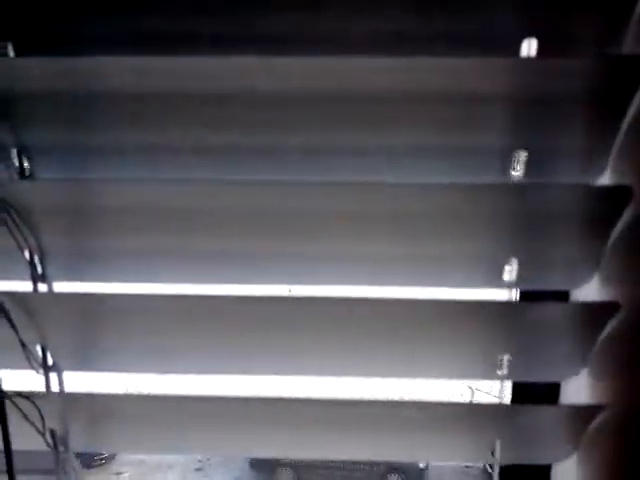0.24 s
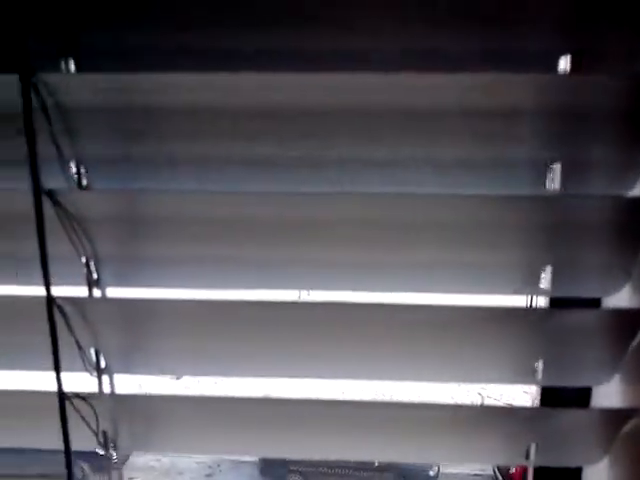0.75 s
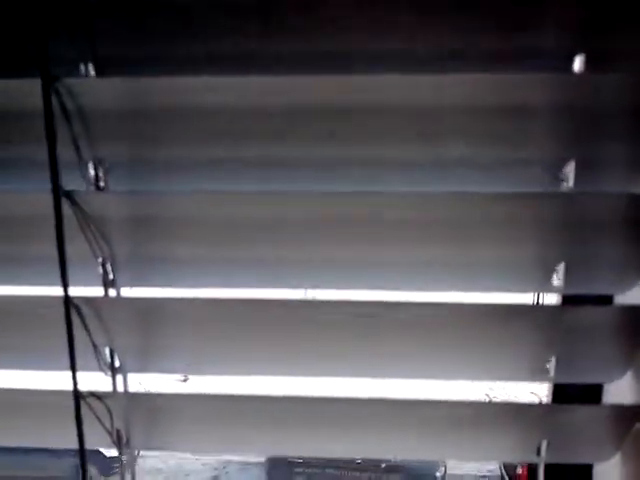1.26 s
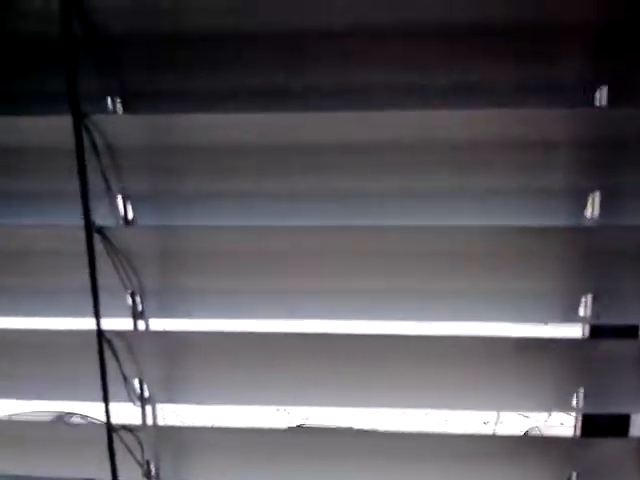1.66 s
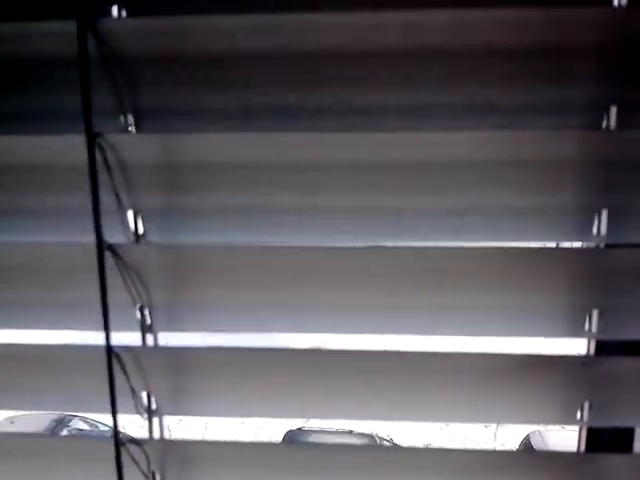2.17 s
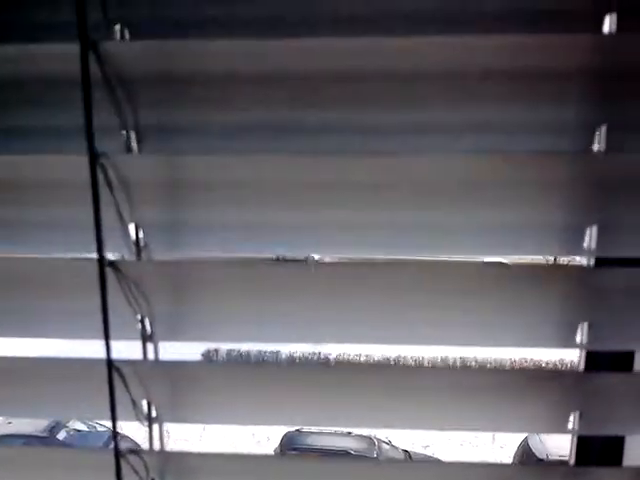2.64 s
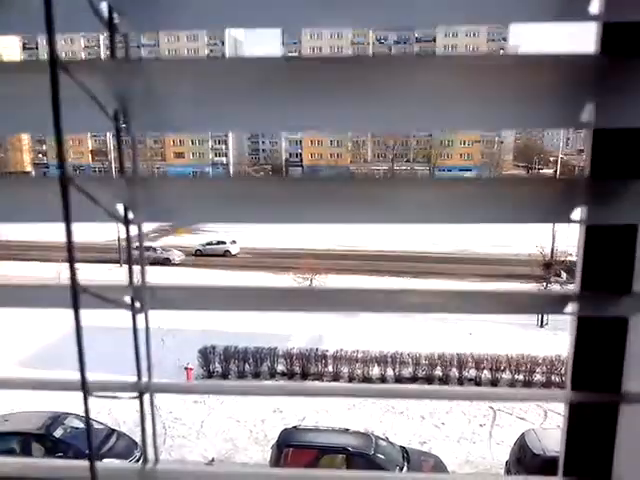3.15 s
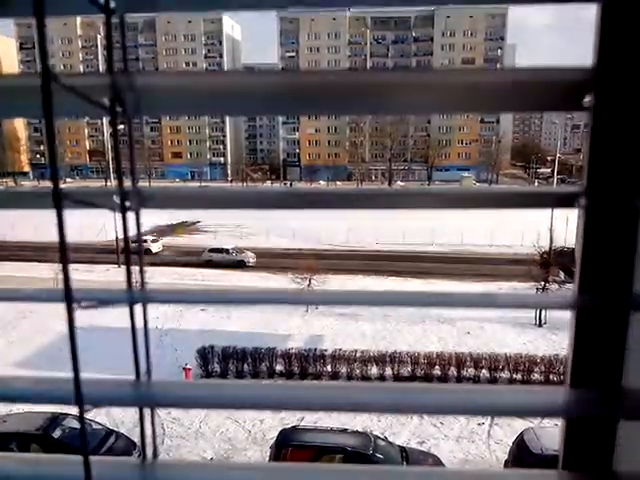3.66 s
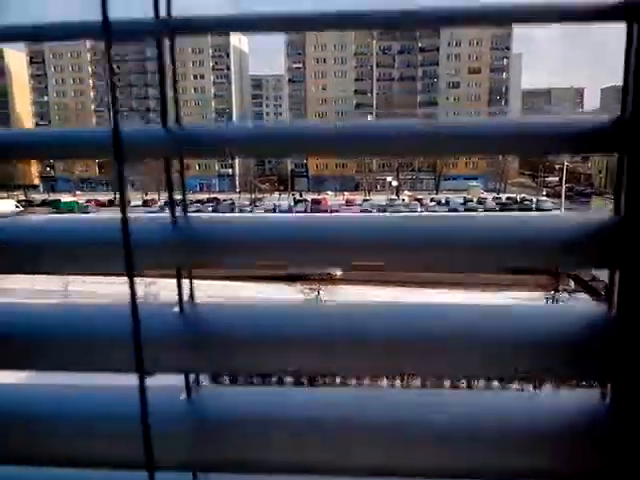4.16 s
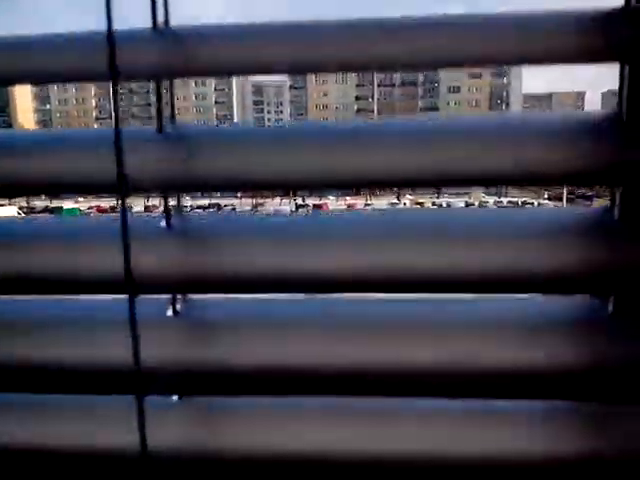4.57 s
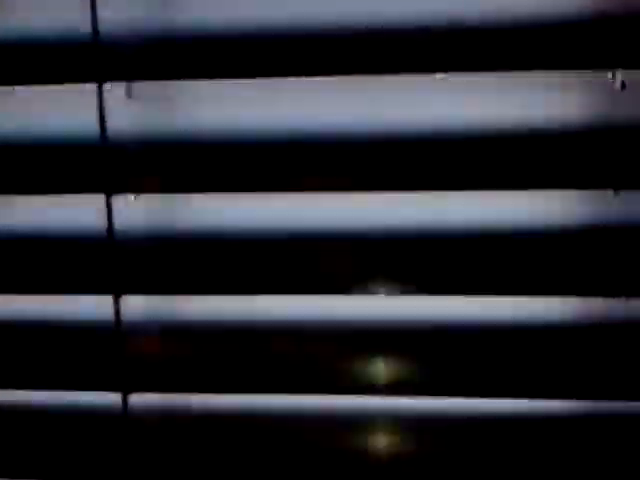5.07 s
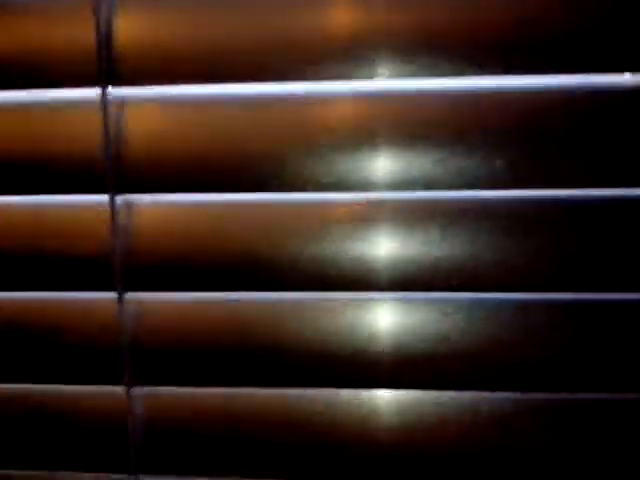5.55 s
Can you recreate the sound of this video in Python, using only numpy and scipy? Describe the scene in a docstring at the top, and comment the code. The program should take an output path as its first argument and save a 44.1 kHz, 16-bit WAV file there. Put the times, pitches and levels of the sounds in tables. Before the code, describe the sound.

Close to a venetian blind in a small quiet room: a short squealing, groaning scrape, a pause, one loud overloaded woody knock, then a cluster of knocks, loose rattles and bright thin slat snaps. Afterwards the tilt gear rasps softly about three times a second, with stray ticks, faint cord rustle and a low hum.

```python
"""Small room, microphone close to a venetian blind that is tilted by its wand.
First the wand rubs along the blind, noisy grains of friction under squealing and groaning tones.
From 0.6 s it knocks slats and frame, ringing modes with a loose rattle; from 1.6 s thin slats snap over brightly.
From 2.3 s the worm gear rasps about three times a second, swells of tiny clicks, as the fingers roll the wand on.
Soft cord drag, still air and a faint hum lie beneath throughout."""
import sys
import numpy as np
from scipy import signal
from scipy.fft import rfft, irfft
from scipy.io import wavfile

SR = 44100
rng = np.random.default_rng(int(sys.argv[2]) if len(sys.argv) > 2 else 0)


def persist_wave(psi):
    """Save psi, clipped to +-1, as 16-bit WAV."""
    counts = np.round(np.clip(psi, -1, 1) * 32767).astype(np.int16)
    wavfile.write(sys.argv[1], SR, np.atleast_2d(counts).T)


N = 256220
TIME = np.arange(N) / SR

# spectrum of the wand's scrape: freq_hz, level_db
RUB_COLOUR = [(100, -15.5), (300, 8), (600, 0), (1000, 10), (1500, 2.5), (1950, 3.5), (2500, -21.5),
              (3200, -19), (4000, -28), (7000, -22)]
# friction tones, each a curve: time_s, pitch_hz, level_db
MAIN_SQUEAL = [(0, 1100, -23.5), (.034, 1042, -22.5), (.18, 1015, -23), (.214, 960, -24.5),
               (.254, 827, -24.5), (.28, 835, -22)]
# a wavering squeal that dives
DIVING_SQUEAL = [(.19, 1943, -53), (.237, 1783, -27), (.3, 1462, -33.5), (.33, 1195, -25.5),
                 (.362, 968, -22), (.383, 938, -32)]
# a thin high whistle
WHISTLE = [(0, 4860, -48), (.058, 4860, -39), (.18, 4858, -44), (.21, 4830, -61.5)]
# two groans
GROAN = [(.05, 415, -27), (.165, 417, -50), (.21, 385.5, -33), (.33, 315, -49.5)]
LOW_GROAN = [(.09, 197.2, -30), (.125, 197.5, -51.5), (.33, 213.6, -40.5), (.378, 180, -31)]
RUB_END_S, RUB_RELEASE_S, SCRAPE_DB = 0.36, 0.026, -28.5
SQUEAL_OCTAVE_DB = -17.5   # the main squeal carries its octave
SQUEAL_ROUGH, WHISTLE_ROUGH, GROAN_ROUGH = .28, .12, .45   # depth of flutter


def rubbing():
    """The wand drags along the blind, then lifts off: uneven grains of friction, with squeals and groans."""
    friction = grains(N, per_s=1600, spread_db=1.5)
    slats = amp(SCRAPE_DB) * colour(friction, RUB_COLOUR)
    unevenness = amp(3.0 * wobble(23))
    scrape = unevenness * held(0, RUB_END_S, RUB_RELEASE_S) * slats
    squeals = squeal(MAIN_SQUEAL, SQUEAL_ROUGH, amp(SQUEAL_OCTAVE_DB)) + squeal(DIVING_SQUEAL, SQUEAL_ROUGH)
    whistle = squeal(WHISTLE, WHISTLE_ROUGH)
    groans = squeal(GROAN, GROAN_ROUGH) + squeal(LOW_GROAN, GROAN_ROUGH)
    rub = scrape + squeals + whistle + groans
    return rub + amp(-9.0) * room(rub)


SQUEAL_RELEASE_S, SQUEAL_FLUTTER_HZ, FRICTION_ATTACK_S = 0.0087, 82.6, 0.0012
SQUEAL_CHATTER = 0.35   # how deeply the head rail shakes a squeal, against its roughness


def squeal(curve, rough, octave=0):
    """A stick-slip tone follows the wand's speed and pressure; it flutters, and chatters with the head rail."""
    time_s, pitch_hz, level_db = np.transpose(curve)
    phase = 2 * np.pi * np.cumsum(np.interp(TIME, time_s, pitch_hz)) / SR
    rail_shake = rms_one(resonate(rng.standard_normal(N), RAIL_MODES))
    chatter = SQUEAL_CHATTER * rough * rail_shake
    tone = (1 + rough * wobble(SQUEAL_FLUTTER_HZ) + chatter) * np.sin(phase)
    tone = tone + rough * wobble(SQUEAL_FLUTTER_HZ) * np.cos(phase)
    overtone = octave * wobble(SQUEAL_FLUTTER_HZ) * np.sin(2 * phase)
    level = amp(np.interp(TIME, time_s, level_db)) * held(0, time_s[-1], SQUEAL_RELEASE_S)
    return level * np.sqrt(2) * (tone + overtone)


def held(start, end, release_s):
    """Envelope of a friction sound: quick attack, hold, exponential release."""
    attack = np.clip((TIME - start) / FRICTION_ATTACK_S, 0, 1)
    return attack * np.exp(-np.clip((TIME - end) / release_s, 0, 50))


# knocks of wand and rail: start_s, peak_db, pitch_hz, crack_db, rattle_db, rattle_pitch_hz, rattle_length_s
KNOCKS = [(0.606, -30, 1700, -38, -30, 1900, 0.006), (1.1685, 2.5, 726, -26.5, -21, 520, 0.0051),
          (1.65, -26, 480, -42.5, -21.5, 600, 0.015), (1.7443, -3.5, 1040, -17.5, -7, 616, 0.025),
          (1.794, -16, 352, -32, -17.5, 560, 0.041), (2.02, -33.5, 1900, -29, -22, 1700, 0.0083),
          (2.034, -20, 840, -30.5, -15.5, 820, 0.014), (2.063, -15.5, 327, -47.5, -17.5, 377, 0.019),
          (2.403, -15, 750, -39, -13.5, 900, 0.013), (2.454, -17.5, 560, -48, -24, 650, 0.01),
          (2.495, -27, 358, -63, -23, 395, 0.015), (2.521, -23, 613, -64.5, -23.5, 500, 0.0059),
          (2.535, -21.5, 416, -65.5, -23, 480, 0.012), (2.681, -25, 500, -37, -26, 500, 0.012),
          (2.765, -30, 1500, -31.5, -21, 1400, 0.011), (2.776, -22, 566, -33.5, -19, 540, 0.011)]
# spectrum of the short crack: freq_hz, level_db
CRACK_COLOUR = [(900, 2.5), (1800, 6), (3000, 0), (4500, -4.5), (7000, -2), (8000, -49.5)]
RATTLE_CRACK_DB = -25.5   # crackle of the rattle, against the crack of the knock


def knocks():
    """A short crack opens each knock and the frame rings; loose slats rattle on, crackling with its crack."""
    out, t = np.zeros(N), TIME[:SR // 4]
    for start_s, peak_db, pitch_hz, crack_db, rattle_db, rattle_hz, rattle_s in KNOCKS:
        ring = amp(peak_db) * frame(t, pitch_hz).sum(axis=0)
        crack = colour(rng.standard_normal(len(t)), CRACK_COLOUR) * np.exp(-t / 0.013)
        crackle = amp(RATTLE_CRACK_DB) * colour(bounces(t, rattle_s), CRACK_COLOUR)
        loose_slats = rattle(t, rattle_db, rattle_hz, rattle_s)
        add(out, start_s, ring + amp(crack_db) * (crack + crackle) + loose_slats)
    return out + amp(-11.0) * room(out)


# what a knock rings with: freq_hz, level_db, t60_s
FRAME_MODES = [(168, -22, 0.29), (248, -15, 0.18), (328.6, -6.5, 0.1), (439.5, -6, 0.031),
               (564, -3.5, 0.025), (634, -5.5, 0.047), (718, -4.5, 0.034), (853, -7, 0.037),
               (968, -9, 0.042), (1077, -4, 0.029), (1256, -12, 0.063), (1616, -16, 0.049),
               (2113, -35.5, 0.06)]


def frame(t, pitch_hz):
    """The modes of the frame, one a row, for a blow that favours one pitch; together they peak at one."""
    rings = []
    for k, (hz, db, t60) in enumerate(FRAME_MODES):
        level = (-1) ** k * amp(db + favour(hz, pitch_hz, slope_db=7.0))
        rings.append(level * np.sin(2 * np.pi * hz * t) * np.exp(-np.log(1000) * t / t60))
    rings = np.array(rings)
    return rings / np.abs(rings.sum(axis=0)).max()


RATTLE_LOW_LAG = 0.37   # exponent: the rattle lasts longer in the low modes
RATTLE_LOWEST_HZ = 145


def rattle(t, db, pitch_hz, length_s):
    """Loose slats, each tuned a little differently, bounce on the frame; the rattle dulls as it dies."""
    out = 0
    for (hz, _, _), ring in zip(FRAME_MODES, frame(t, pitch_hz)):
        detuned_ring = np.interp(t * detune(), t, ring)
        contacts = bounces(t, length_s * (pitch_hz / hz) ** RATTLE_LOW_LAG)
        shaken = signal.fftconvolve(detuned_ring, contacts)[:len(t)]
        out = out + np.std(ring) * rms_one(shaken)
    return amp(db) * signal.sosfilt(signal.butter(2, RATTLE_LOWEST_HZ, "high", fs=SR, output="sos"), out)


BOUNCES_PER_S = 700


def bounces(t, length_s):
    """A flurry of small contacts that builds quickly and dies away."""
    contacts = grains(len(t), per_s=BOUNCES_PER_S, spread_db=1.0)
    return contacts * np.sqrt(t / length_s) * np.exp(-t / length_s)


# slats snapping over: start_s, clatter_db, pitch_hz, clatter_t60_s, ring_peak_db
SNAPS = [(1.646, -45, 6480, 0.085, -37), (1.7464, -18.5, 6880, 0.007, -24),
         (2.017, -21.5, 5510, 0.016, -19), (2.056, -35, 4700, 0.037, -42), (2.6783, -26, 6355, 0.032, -9.5),
         (2.7624, -42, 7000, 0.42, -29), (2.8124, -18, 6540, 0.071, -21.5), (3.091, -41, 6640, 0.15, -33)]
# ringing of a thin slat: freq_hz, width_hz, level_db
SLAT_MODES = [(2540, 25, -10), (4233, 80, -7), (5500, 160, -12), (5865, 65, -0.5), (6395, 65, 0),
              (6673, 110, -0.5)]
# spectrum of the clatter: freq_hz, level_db
CLATTER_COLOUR = [(800, 1.5), (2000, 1), (3200, -12.5), (4500, -16.5), (5500, -13), (6800, -10.5),
                  (8000, -50.5)]
SLAT_HZ = 6380   # the main ring of a slat; in a snap all its modes shift with it
TWANG_S, SLAT_BUZZ_S = 2.683, 0.0012


def snaps():
    """A thin slat catches and springs free: it strikes its neighbour twice, clatters, rings with beating modes."""
    out, t = np.zeros(N), TIME[:SR // 4]
    for start_s, clatter_db, pitch_hz, t60, ring_db in SNAPS:
        spectrum = [(hz, band_db + favour(hz, pitch_hz, slope_db=18.5)) for hz, band_db in CLATTER_COLOUR]
        contacts = colour(grains(len(t), per_s=11000, spread_db=1.5), spectrum)
        clatter = contacts * twice(t, max(t60, .004) / np.log(1000))
        buzz = rng.standard_normal(len(t)) * twice(t, SLAT_BUZZ_S)
        modes = [(hz * pitch_hz / SLAT_HZ, width, mode_db) for hz, width, mode_db in SLAT_MODES]
        ring = peak_one(resonate(buzz, modes))
        add(out, start_s, amp(clatter_db) * clatter + amp(ring_db) * ring)
    add(out, TWANG_S, twang())
    return out + amp(-4.0) * room(out)


REBOUND_S, REBOUND_DB = 0.0058, -4


def twice(t, decay_s):
    """Envelope of a strike and its rebound."""
    fade = np.exp(-t / decay_s)
    rebound = np.interp(t - REBOUND_S, t, fade, left=0)
    return np.hypot(fade, amp(REBOUND_DB) * rebound)


# bending tones of the slat that was bowed hardest: freq_hz, level_db
TWANG = [(260, -23), (576, -26)]
TWANG_T60_S = .08


def twang():
    """The slat that was bowed hardest swings back with its two bending tones."""
    t = TIME[:SR // 4]
    tones = sum(amp(db) * np.sin(2 * np.pi * hz * t) for hz, db in TWANG)
    return tones * np.exp(-np.log(1000) * t / TWANG_T60_S)


# strength of the turns, in order: rasp_db, pitch_hz, hiss_db
TURNS = [(-39, 1250, -49), (-44, 1100, -59), (-37, 1210, -49.5), (-43, 970, -53.5), (-41.5, 1540, -45.5),
         (-37, 1020, -43), (-40.5, 1360, -44.5), (-39.5, 1100, -49.5), (-37, 1000, -46), (-42.5, 1090, -58)]
# the gear catches and lets go, out of step with the turns: start_s, rasp_db, pitch_hz, hiss_db, swell_s
CATCHES = [(0.439, -36, 1820, -56, 0.0042), (2.258, -44.5, 1190, -64, 0.0019),
           (2.941, -36.5, 1200, -60, 0.0043), (3.338, -34, 1010, -62, 0.0076),
           (3.371, -30.5, 1010, -42, 0.0023), (4.3136, -28.5, 1420, -37, 0.0019),
           (4.323, -26.5, 980, -51, 0.0045), (4.981, -37.5, 1250, -79, 0.0023),
           (5.01, -36.5, 1140, -54, 0.0063), (5.154, -43.5, 1340, -56, 0.004),
           (5.373, -39.5, 970, -61, 0.0042), (5.734, -43, 940, -62, 0.054)]
# soft bumps of the head rail in its brackets: start_s, peak_db
BUMPS = [(1.493, -44), (2.831, -31), (3.42, -40.5), (4.495, -45), (4.559, -42)]
# ringing of the head rail: freq_hz, width_hz, level_db
RAIL_MODES = [(167.8, 11, 2.5), (218, 18, -2), (311, 17.4, 1.5), (364, 170, -13)]
FIRST_TURN_S, TURN_S, RASP_SWELL_S = 2.308, .3355, 0.017   # the wand turns evenly


def gear():
    """The worm rasps once a turn; at times it catches with a tick, cords squeak, the head rail bumps softly."""
    out, t = np.zeros(N), TIME[:SR // 4]
    for turn, (rasp_db, pitch_hz, hiss_db) in enumerate(TURNS):
        add(out, FIRST_TURN_S + turn * TURN_S, slip(rasp_db, pitch_hz, hiss_db, RASP_SWELL_S))
    for start_s, rasp_db, pitch_hz, hiss_db, swell_s in CATCHES:
        add(out, start_s, slip(rasp_db, pitch_hz, hiss_db, swell_s))
    for start_s, peak_db in BUMPS:
        bump = resonate(bounces(t, RASP_SWELL_S / 2), RAIL_MODES)
        add(out, start_s, amp(peak_db) * peak_one(bump))
    out = out + squeaks()
    return out + amp(-4.0) * room(out)


# ringing of the gear box: freq_hz, width_hz, level_db
GEAR_MODES = [(992, 51, 10.5), (1123, 57, 9), (1245, 120, 8), (1530, 190, -0.5), (1773, 61, -1),
              (2113, 120, 0)]
# spectrum of the hiss in a slip: freq_hz, level_db
HISS_COLOUR = [(1500, 11), (4800, 3), (6000, 13.5), (7200, 17), (8000, -55.5)]
TEETH_PER_S, TEETH_SPREAD_DB = 600, 2.5   # the tiny clicks of a slip
THUD_DB = 3.5   # the thud of the rail, against the hiss


def slip(rasp_db, pitch_hz, hiss_db, swell_s):
    """One slip of the worm is a swell of tiny clicks; the gear box and the head rail ring on after it."""
    age = TIME[:SR // 4] / max(swell_s, .001)
    swell = age * np.exp(1 - age)
    modes = [(hz * detune(), width, mode_db + favour(hz, pitch_hz, slope_db=18.0))
             for hz, width, mode_db in GEAR_MODES]
    clicks = grains(len(age), per_s=TEETH_PER_S, spread_db=TEETH_SPREAD_DB) * swell
    rasp = rms_one(resonate(clicks, modes))
    thud = amp(THUD_DB) * rms_one(resonate(clicks, RAIL_MODES))
    scrape = colour(clicks, HISS_COLOUR) + thud
    return np.std(swell) * (amp(rasp_db) * rasp + amp(hiss_db) * scrape)


# squeaks of a cord: middle_s, half_length_s, pitch_hz, level_db
SQUEAKS = [(2.972, 0.0055, 2670, -39.5), (5.167, 0.045, 2810, -57)]


def squeaks():
    """A cord slips through a slat with a short, rough squeak and its weaker octave."""
    out = 0
    for middle_s, half_s, hz, db in SQUEAKS:
        phase = 2 * np.pi * hz * TIME + .7 * wobble(300)
        swell = np.exp(-((TIME - middle_s) / half_s) ** 2)
        out = out + amp(db) * swell * (np.sin(phase) + np.sin(2 * phase) / 2)
    return out


# the cords slide faster for a moment, most as the slats close: middle_s, half_length_s, rustle_db, gear_box_db
DRAGS = [(0.701, 0.45, -66, -57.5), (2.338, 0.16, -57.5, -55.5), (3.63, 0.017, -73.5, -51),
         (4.256, 0.026, -67, -53), (4.554, 0.046, -57, -59), (5.503, 0.03, -45, -47),
         (5.553, 0.45, -55, -61.5)]
# spectrum of the cords' rustle: freq_hz, level_db
RUSTLE_COLOUR = [(2400, -7.5), (4300, 2.5), (7000, -5)]
# steady drag: rustle on the slats, murmur of the gear box and of the head rail
RUSTLE_FLOOR_DB, BOX_FLOOR_DB, RAIL_FLOOR_DB = -73, -72, -65
SLAT_RING_DB = -3.5   # the dragged slats ring faintly: against the rustle


def cords():
    """Between slips the ladder cords keep dragging softly and unevenly over slats and rail."""
    rustle_gain, box_gain = amp(RUSTLE_FLOOR_DB), amp(BOX_FLOOR_DB)
    for middle_s, half_s, rustle_db, box_db in DRAGS:
        swell = np.exp(-((TIME - middle_s) / half_s) ** 2)
        rustle_gain = np.hypot(rustle_gain, amp(rustle_db) * swell)
        box_gain = np.hypot(box_gain, amp(box_db) * swell)
    grip_db = 2.5 * wobble(9)
    flutter_db = 1.8 * wobble(30)
    fibres = grains(N, per_s=7000, spread_db=2.5)
    slats = colour(fibres, RUSTLE_COLOUR) + amp(SLAT_RING_DB) * rms_one(resonate(fibres, SLAT_MODES))
    rustle = rustle_gain * amp(grip_db + flutter_db) * slats
    box = box_gain * rms_one(resonate(grains(N, per_s=2200, spread_db=3.0), GEAR_MODES))
    rail = amp(RAIL_FLOOR_DB) * rms_one(resonate(grains(N, per_s=81, spread_db=4.5), RAIL_MODES))
    return rustle + amp(grip_db) * (box + rail)


# still air of the room: freq_hz, level_db per Hz
AIR = [(30, -19), (134, -6.5), (180, 1.5), (235, -7), (900, -13.5), (8000, -43)]
# faint hum in the room: freq_hz, level_db
HUM = [(116, -66)]
AIR_DB = -55.5


def background():
    """The quiet air of the room is shaped noise; a faint low sine hums in it."""
    air = amp(AIR_DB) * colour(rng.standard_normal(N), AIR)
    hum = sum(amp(db) * np.sin(2 * np.pi * hz * TIME) for hz, db in HUM)
    return air + hum


# the small room: freq_hz, t60_s, level_db
ROOM = [(149.5, 0.63, -2), (397, 0.32, 4.5), (790, 0.32, -6), (1620, 0.27, -3), (3500, 0.23, 5),
        (7100, 0.29, -4.5)]


def room(x):
    """Diffuse reflections as noise dying band by band; each band has its share of energy, set by ROOM."""
    t, tail = TIME[:SR * 3 // 4], 0
    edges = np.geomspace(70, 9000, 11)
    room_hz, t60, db = np.transpose(ROOM)
    for low, high in zip(edges, edges[1:]):
        band_filter = signal.butter(2, [low, high], "band", fs=SR, output="sos")
        band = signal.sosfilt(band_filter, rng.standard_normal(len(t)))
        hz = np.sqrt(low * high)
        decay = np.exp(-np.log(1000) * t / np.interp(hz, room_hz, t60))
        band = band * decay * np.clip(t / 0.0013, 0, 1) ** 2
        share = np.sqrt(2 * (high - low) / SR / len(t))
        tail = tail + rms_one(band) * amp(np.interp(hz, room_hz, db)) * share
    return signal.fftconvolve(x, tail)[:N]


def grains(count, per_s, spread_db):
    """Friction: random tiny slips of uneven size; rms 1."""
    sizes = amp(abs(spread_db) * np.minimum(rng.exponential(1, count), 4)) * rng.choice([-1, 1], count)
    return rms_one(sizes * (rng.random(count) < per_s / SR))


def resonate(x, modes):
    """Parallel resonances of (Hz, width in Hz, dB), signs alternating."""
    out = 0
    for k, (hz, width, db) in enumerate(modes):
        r = np.exp(-np.pi * width / SR)
        b = (1 - r * r) / 2 * np.array([1, 0, -1])
        a = [1, -2 * r * np.cos(2 * np.pi * hz / SR), r * r]
        out = out + (-1) ** k * amp(db) * signal.lfilter(b, a, x + 1e-18)
    return out


def favour(hz, centre_hz, slope_db):
    """The place of contact favours modes near one pitch: dB lost by octaves away from it."""
    return -slope_db * np.abs(np.log2(hz / centre_hz))


DETUNE = .05


def detune():
    """Each contact falls on another spot, and shifts a resonance a little."""
    return 1 + DETUNE * rng.uniform(-1.1, 1)


def wobble(hz):
    """Chance fluctuation up to a given speed; rms 1."""
    return rms_one(signal.sosfilt(signal.butter(2, hz, fs=SR, output="sos"), rng.standard_normal(N)))


def colour(x, points):
    """Shape a sound by a spectrum that falls away beyond its ends; rms 1."""
    hz = np.arange(len(x) // 2 + 1) * SR / len(x) + 1
    skirts = np.minimum(hz / points[0][0], 1) ** 2 * np.minimum(points[-1][0] / hz, 1) ** 2
    return rms_one(irfft(rfft(x) * amp(at_hz(points, hz)) * skirts, len(x)))


def at_hz(points, hz):
    """Read a spectrum on a log-frequency axis."""
    f, value = np.transpose(points)
    return np.interp(np.log(np.maximum(hz, 1)), np.log(f), value)


def amp(db):
    """Decibels to gain."""
    return 10 ** (np.asarray(db) / 20)


def rms_one(x):
    """Scale to an rms of one."""
    return x / np.sqrt(np.mean(x ** 2) + 1e-20)


def peak_one(x):
    """Scale to a peak of one."""
    return x / (np.abs(x).max() + 1e-20)


def add(out, s, sound):
    """Mix a sound in at a time in seconds."""
    start = max(round(s * SR), 0)
    out[start:start + len(sound)] += sound[:N - start]


def scene():
    """The blind, close by, over the quiet air of the room."""
    return (rubbing() + knocks() + snaps() + gear() + cords() + background())[None]


CUTOFF_HZ = 7600


def record(dry):
    """The microphone thins the deep bass, peaks beyond full scale overload, the top is cut."""
    heard = signal.sosfilt(signal.butter(1, 60, "high", fs=SR, output="sos"), dry)
    overloaded = np.clip(heard, -1, 1)
    return signal.sosfilt(signal.ellip(8, .3, 70, CUTOFF_HZ, fs=SR, output="sos"), overloaded)


dry = scene()
out = record(dry)
persist_wave(out)
```